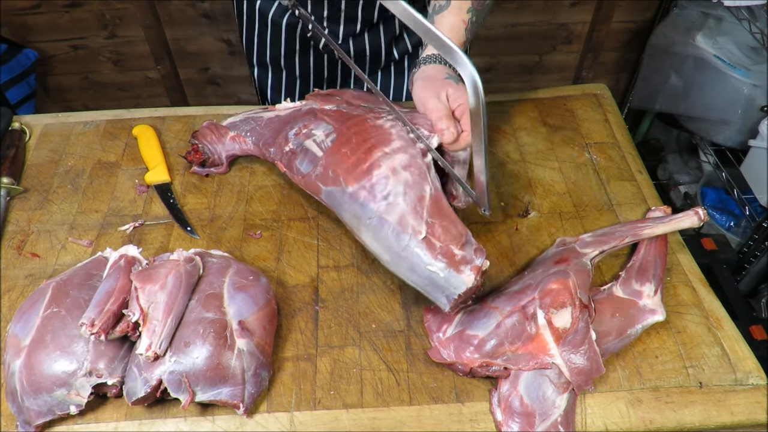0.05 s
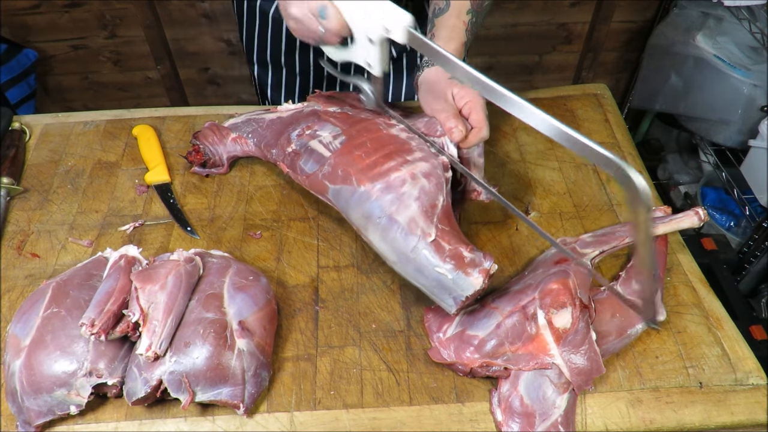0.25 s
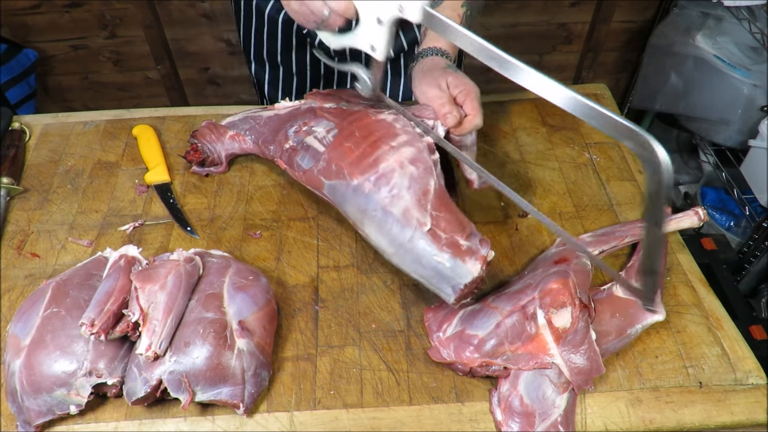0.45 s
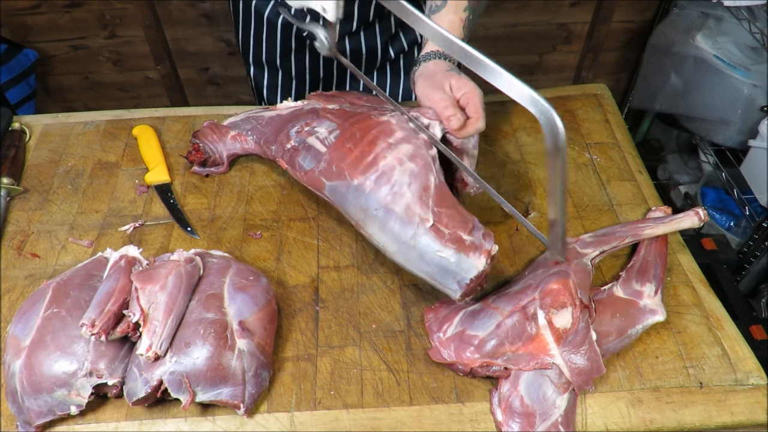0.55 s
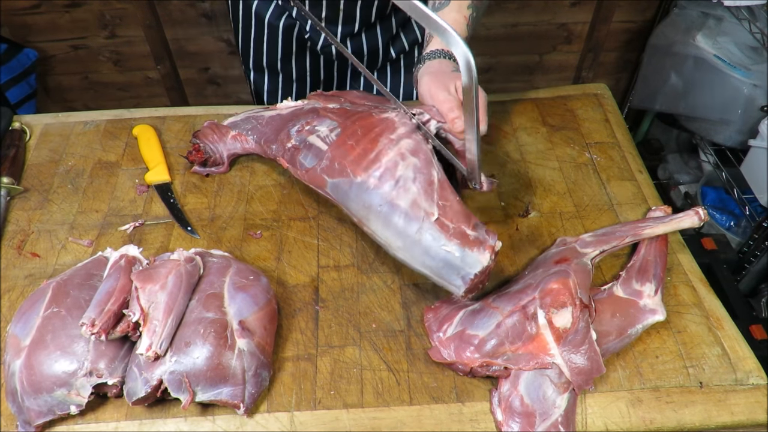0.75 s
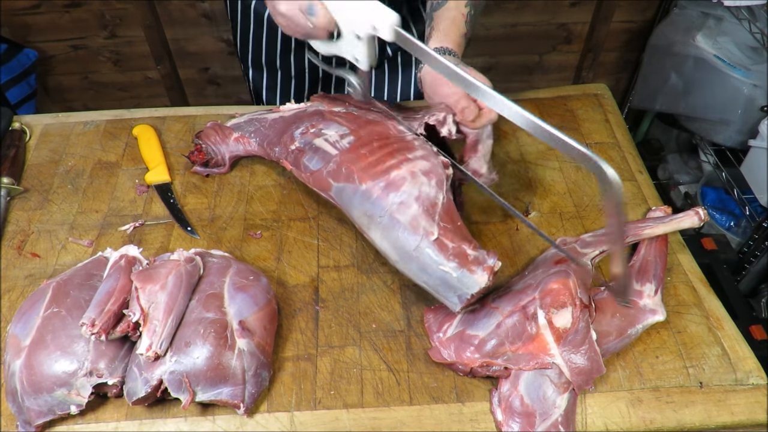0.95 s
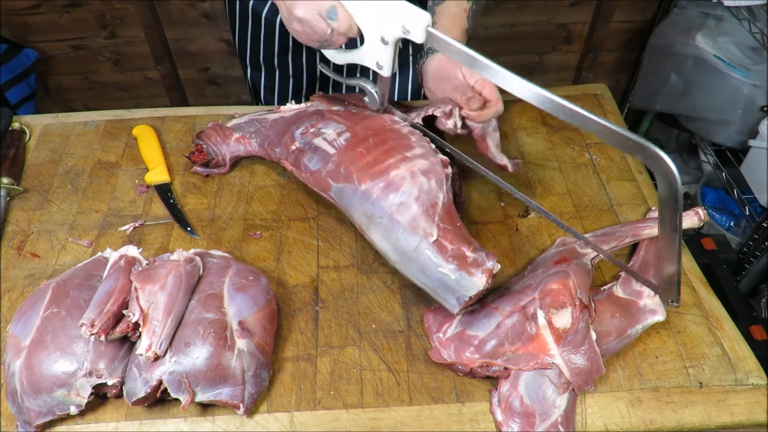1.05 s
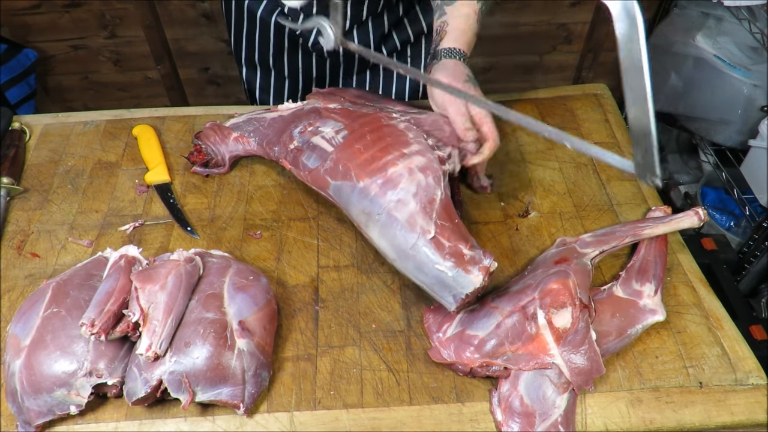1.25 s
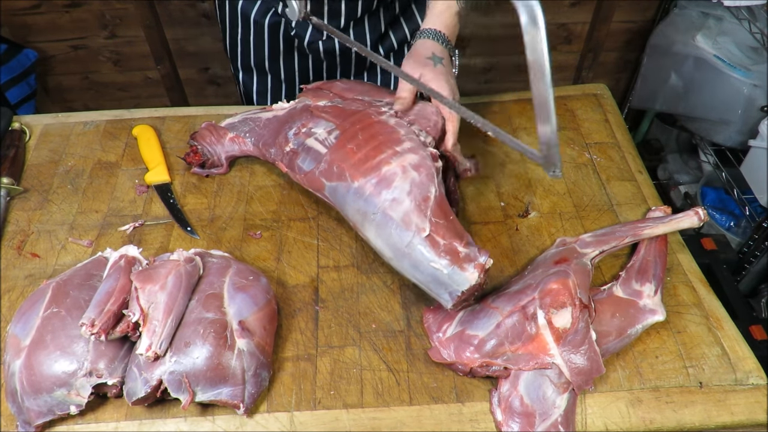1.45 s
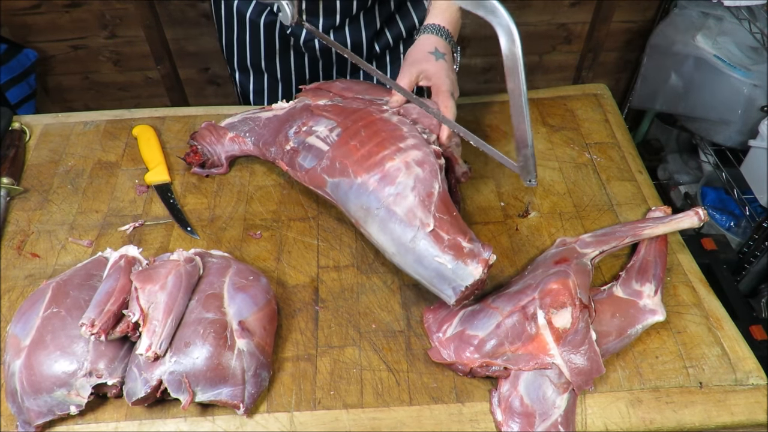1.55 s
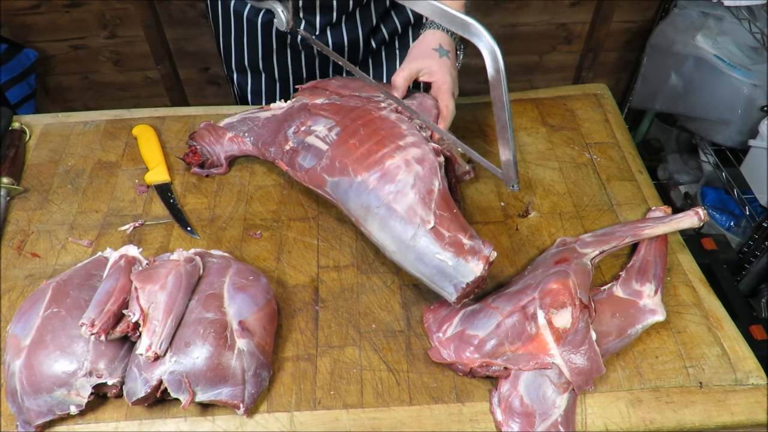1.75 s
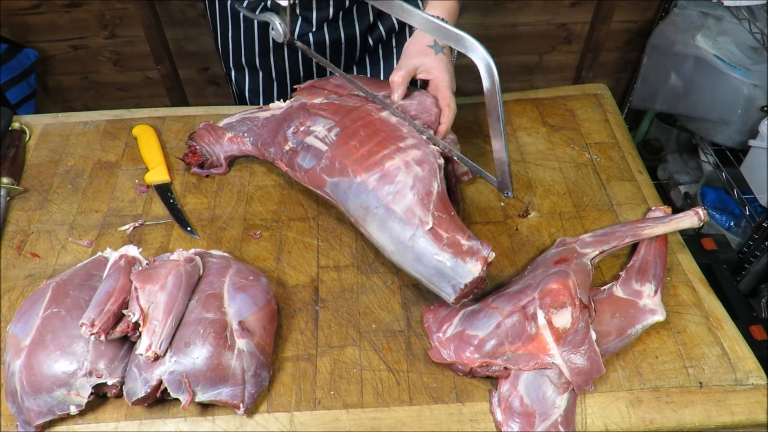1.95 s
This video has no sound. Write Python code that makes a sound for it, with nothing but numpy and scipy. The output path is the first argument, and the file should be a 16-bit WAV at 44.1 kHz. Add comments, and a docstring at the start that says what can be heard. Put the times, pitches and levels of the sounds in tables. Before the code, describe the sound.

Bone sawing heard close up: two quieter scratchy pulls alternate with two strong, hollow, groaning pushes with gritty hiss, then the saw rests, leaving a soft wet scuff, tiny ticks and quiet room air.

```python
"""A hand saw rasps through rib bone on a wooden block: first a pull, which only scrapes.
Then a push: the teeth bite faster, then slower, sweeping through the ring of bone and block.
A second pull and push follow, then rest with a few faint knocks, ticks and a scuff.
Struck resonators give the rings; filtered grains give the grit's hiss and the singing blade.
A small hard room and quiet air noise surround the nearly mono sound."""
import sys
import numpy as np
from scipy import signal
from scipy.io import wavfile
from scipy.ndimage import uniform_filter1d

SR = 44100
rng = np.random.default_rng(int(sys.argv[2]) if len(sys.argv) > 2 else 0)


def level_to_linear(level):
    """Convert decibel levels to linear amplitude factors, elementwise."""
    exponent = np.asarray(level, float) / 20
    return 10 ** exponent


def inscribe(sig):
    """Save sig as 16-bit PCM at rate SR to the path in sys.argv[1].

    A 1-D sig is mono; a 2-D sig holds one channel per row.
    Samples are clipped to [-1, 1] before scaling.
    """
    pcm = np.round(np.clip(np.atleast_2d(sig).T, -1, 1) * 32767)
    wavfile.write(sys.argv[1], SR, pcm.astype(np.int16))


N = 88773


def evened(x):
    """Power normalisation: scales to rms 1."""
    return x / np.sqrt(np.mean(x ** 2) + 1e-20)


def curve(rows, axis=1):
    """Piecewise-linear envelope: one column of a table over time."""
    rows = np.array(rows, float)
    return np.interp(np.arange(N) / SR, rows[:, 0], rows[:, axis])


def read(points, hz):
    """Logarithmic frequency scale: interpolates a spectrum table at hz."""
    f, value = np.transpose(points)
    return np.interp(np.log(hz + 1), np.log(f + 1), value)


def colour(x, points):
    """Minimum-phase filtering: shapes x to a spectrum, with filter energy 1."""
    level_db = np.maximum(read(points, abs(np.fft.fftfreq(4096, 1 / SR))), -100)
    log_gain = np.log(level_to_linear(level_db))
    # the Hilbert transform of the log gain gives the phase of a causal filter
    taps = np.fft.ifft(np.exp(np.conj(signal.hilbert(log_gain)))).real[:2048]
    return signal.oaconvolve(x, taps / np.linalg.norm(taps))[:N]


def ring(x, modes):
    """Modal resonance: x strikes a sum of dying sines, with total energy 1."""
    t = np.arange(6000) / SR
    taps = np.zeros(len(t))
    for k, (hz, width, db) in enumerate(modes):
        decay = np.exp(-np.pi * width * t)
        taps += (-1) ** k * level_to_linear(db) * width * decay * np.sin(2 * np.pi * hz * t)
    return signal.oaconvolve(x, taps / np.linalg.norm(taps))[:N]


def grains(per_s, spread_db):
    """Random impulse process: clicks of uneven size and random sign, rms 1."""
    size = level_to_linear(spread_db * np.minimum(rng.exponential(1, N), 4)) * rng.choice([-1., 1.], N)
    return evened(size * (rng.random(N) < per_s / SR))


# the push strokes: start_s, end_s
PUSH_STROKES = [(.255, .58), (.975, 1.4)]


def push_gate():
    """Stroke alternation: 1 during a push, 0 otherwise, with 10 ms ramps."""
    now = np.arange(N) / SR
    return sum(np.clip(np.minimum(now - a, b - now) / .01, 0, 1) for a, b in PUSH_STROKES)


# rate at which teeth pass the bone on the pushes: time_s, tooth_rate_hz
TOOTH_RATE = [(.25, 240), (.29, 380.8), (.318, 404), (.34, 637.4), (.365, 704.5), (.39, 518), (.405, 439),
              (.425, 438.5), (.445, 395), (.48, 384.2), (.55, 200), (.975, 260), (1.0, 381.5),
              (1.02, 393.1), (1.035, 396.6), (1.05, 569.5), (1.07, 644), (1.085, 559.3), (1.1, 515.7),
              (1.115, 440), (1.13, 410.9), (1.15, 396.7), (1.17, 367), (1.22, 203.9)]


def tooth_turns():
    """Phase accumulation: the integrated, slightly wobbling tooth rate counts teeth passed."""
    jitter = .05  # rms share of the tooth rate
    wobble = evened(uniform_filter1d(rng.standard_normal(N), size=120))
    return np.cumsum(curve(TOOTH_RATE) * (1 + jitter * wobble)) / SR


# groan of the block at the tooth rate, which also scales the tooth strikes: time_s, level_db
BITE_LEVEL = [(.27, -60), (.3, -31), (.318, -18), (.33, -30), (.36, -33), (.385, -30), (.405, -17),
              (.415, -26), (.43, -13), (.445, -17), (.455, -36), (.475, -45), (.484, -22), (.5, -50),
              (.52, -80), (.985, -70), (1.005, -29), (1.017, -14), (1.03, -23), (1.04, -40), (1.07, -27),
              (1.088, -17), (1.097, -28), (1.106, -13), (1.115, -18), (1.125, -14), (1.148, -19),
              (1.16, -36), (1.21, -80)]


def tooth_bites(turns, push):
    """Periodic forcing: a sine groan at the tooth rate, and one uneven impulse per tooth."""
    uneven_db, strikes_db = 6, -18  # spread of the bites; strikes relative to the groan
    bites = np.diff(np.floor(turns), prepend=0) * level_to_linear(uneven_db * rng.standard_normal(N))
    level_db = curve(BITE_LEVEL)
    groan = np.sqrt(2) * np.sin(2 * np.pi * turns) * level_to_linear(level_db) * push
    strikes = evened(bites) * level_to_linear(level_db + strikes_db) * push
    return groan, strikes


# uneven scraping, the deep ring before its trim on pushes:
# time_s, upper_bone_level_db, deep_ring_level_db, frame_ring_level_db
SCRAPE_LEVELS = [(0.0, -43.5, -27.5, -40.5), (0.024, -49, -52, -61), (0.046, -45, -33, -32.5),
                 (0.064, -36.5, -38, -31), (0.1, -38, -27, -37.5), (0.136, -46, -43.5, -58),
                 (0.166, -42.5, -31.5, -55), (0.184, -48.5, -47.5, -43), (0.238, -53.5, -49.5, -61),
                 (0.256, -71, -31.5, -46), (0.266, -49, -28, -36), (0.322, -29, -17.5, -22),
                 (0.368, -27, -23.5, -39), (0.4, -27.5, -17.5, -41), (0.426, -33, -20.5, -32),
                 (0.444, -47.5, -18, -35), (0.466, -39.5, -30, -40), (0.484, -44.5, -23.5, -42),
                 (0.578, -64, -52, -71), (0.64, -56.5, -42.5, -59), (0.666, -46.5, -31.5, -41.5),
                 (0.706, -43, -41.5, -57), (0.734, -44, -33.5, -34), (0.76, -44.5, -28.5, -43),
                 (0.796, -44.5, -32.5, -33.5), (0.836, -47, -35, -44), (0.85, -45, -33, -54.5),
                 (0.872, -44.5, -38.5, -46), (0.922, -56.5, -58.5, -65), (0.962, -67, -57.5, -69),
                 (0.98, -61, -25.5, -45.5), (1.002, -36.5, -20, -24), (1.02, -38.5, -29, -27),
                 (1.05, -27, -23, -38), (1.078, -28, -19, -37.5), (1.1, -32.5, -20.5, -49.5),
                 (1.132, -38, -16.5, -42.5), (1.162, -43, -23, -44), (1.27, -63.5, -44, -67),
                 (1.3, -64.5, -48, -60.5)]
# rings of the bone, relative levels: pitch_hz, width_hz, push_level_db, pull_level_db
BONE_MODES = [(546, 40, -8.5, 1), (652.7, 20, 1, -6), (868, 67, -5.5, -7), (960, 47, 1, -8),
              (1000, 35, 1, -5), (1113.6, 28, -2, -4), (1174.5, 49, -3.5, -11), (1238, 36, -7.5, -7),
              (1320, 36, -5, -10), (1448, 15, -3.5, -6), (1560, 58, -13.5, -3.5), (1702, 32, -3.5, -9.5),
              (1752, 45, -9, -13.5), (1880, 90, -8.5, -12.5), (2078, 70, -15.5, -21.5),
              (2322, 50.2, -8.5, -14), (2628, 75, -21.5, -32)]
# response between the modes, relative: frequency_hz, level_db_per_hz
BROAD_SPECTRUM = [(200, -29.5), (400, -11.5), (700, 1), (1200, -3.5), (2000, -7), (2800, -10),
                  (4000, -13.5), (6000, -22.5), (9000, -53.5)]
# deep rings of the block, relative levels: pitch_hz, width_hz, level_db
BLOCK_MODES = [(315, 12, -12), (339, 30, -9), (403, 40.7, 3), (460, 49, -6), (520.5, 19, -8.5)]
# rings of the saw frame, relative levels: pitch_hz, width_hz, level_db
FRAME_MODES = [(769.2, 26, 2), (1598, 69, -11)]


def ringing_body(strikes, push):
    """Forced modal vibration: tooth strikes and random slips ring bone, block and saw frame."""
    slips_per_s, slip_spread_db = 2700, 2.5
    broad_db, push_ring_db = -5.0, -7.0  # the deep ring yields to the groan on a push
    low_cut_hz = 270
    slips = grains(slips_per_s, slip_spread_db)
    drive = strikes + slips * level_to_linear(curve(SCRAPE_LEVELS))
    push_modes = [(hz, width, push_db) for hz, width, push_db, _ in BONE_MODES]
    pull_modes = [(hz, width, pull_db) for hz, width, _, pull_db in BONE_MODES]
    bone = ring(drive * push, push_modes) + ring(drive * (1 - push), pull_modes)
    broad = level_to_linear(broad_db) * colour(drive, BROAD_SPECTRUM)
    deep_db = curve(SCRAPE_LEVELS, axis=2) + push_ring_db * push
    block = ring(slips * level_to_linear(deep_db), BLOCK_MODES)
    frame = ring(slips * level_to_linear(curve(SCRAPE_LEVELS, axis=3)), FRAME_MODES)
    low_cut = signal.butter(6, low_cut_hz, "highpass", fs=SR, output="sos")
    return signal.sosfilt(low_cut, bone + broad + block + frame)


# drive of the grit, the blade before its trim on pushes, the fizz before its high-pass:
# time_s, hiss_level_db, blade_level_db, fizz_level_db
GRIT_LEVELS = [(0.0, -51, -54, -62), (0.02, -58, -53, -74.5), (0.042, -53, -58, -68.5),
               (0.05, -42.5, -41.5, -59.5), (0.076, -38, -40.5, -48), (0.136, -46, -39.5, -55),
               (0.148, -56, -76, -70), (0.166, -44.5, -41.5, -57), (0.238, -70.5, -64, -76.5),
               (0.264, -57.5, -64.5, -67), (0.3, -37.5, -39.5, -47.5), (0.346, -35, -37, -47.5),
               (0.4, -37, -41.5, -48.5), (0.55, -72, -76, -79), (0.592, -72.5, -72, -77.5),
               (0.604, -53, -70.5, -61.5), (0.644, -62.5, -67.5, -72), (0.672, -42, -43.5, -76),
               (0.69, -49.5, -53, -54.5), (0.698, -43.5, -43.5, -57.5), (0.726, -49, -48, -56),
               (0.796, -43, -39, -60), (0.86, -52, -50.5, -66), (0.872, -44.5, -43.5, -58),
               (0.954, -73, -70.5, -81), (0.974, -66, -68.5, -71.5), (0.994, -39, -55, -55),
               (1.01, -39, -46, -59.5), (1.024, -40.5, -44, -59.5), (1.064, -31.5, -30.5, -37),
               (1.086, -33.5, -40.5, -42), (1.204, -63.5, -62, -77.5), (1.266, -81.5, -64, -91),
               (1.3, -71.5, -75, -81)]
# colour of the grit hiss, relative: frequency_hz, level_db_per_hz
HISS_SPECTRUM = [(1180, -6.5), (2000, -4.5), (3070, -5), (4190, 0.5), (5190, 1.5), (6060, 0.5), (6550, 6),
                 (8180, 3), (15600, -13.5)]
# singing modes of the blade, relative levels: pitch_hz, width_hz, level_db
BLADE_MODES = [(5480, 120, -8), (5840, 180, -3), (6150, 110, 0)]


def grit_and_blade(turns, push):
    """Amplitude modulation: grit pulses with the teeth on pushes, hisses and excites the blade."""
    grains_per_s, grain_spread_db, pulse_depth = 9000, -1, .4
    push_song_db, fizz_hz = -4.0, 10500  # the loaded blade sings less
    pulse = 1 + pulse_depth * push * np.cos(2 * np.pi * turns)
    grit = grains(grains_per_s, grain_spread_db) * pulse
    hiss = colour(grit * level_to_linear(curve(GRIT_LEVELS)), HISS_SPECTRUM)
    song_db = curve(GRIT_LEVELS, axis=2) + push_song_db * push
    song = ring(grit * level_to_linear(song_db), BLADE_MODES)
    high_pass = signal.butter(2, fizz_hz, "highpass", fs=SR, output="sos")
    fizz = signal.sosfilt(high_pass, grit * level_to_linear(curve(GRIT_LEVELS, axis=3)))
    return hiss + song + fizz


# low shake through the table: time_s, level_db
RUMBLE_LEVEL = [(0.0, -59), (0.024, -68), (0.386, -70.5), (0.412, -62.5), (0.626, -94.5), (0.672, -68),
                (0.84, -79.5), (0.872, -66), (0.926, -78), (1.118, -63), (1.248, -81), (1.3, -77)]


def table_shake():
    """Band-limited random vibration: low noise follows a level envelope."""
    band = signal.butter(2, [35, 84.6], "bandpass", fs=SR, output="sos")  # Hz
    shake = signal.sosfilt(band, rng.standard_normal(N))
    return evened(shake) * level_to_linear(curve(RUMBLE_LEVEL))


def saw():
    """Superposition: groan, ringing body, grit and shake add, then fade as the saw lifts."""
    push, turns = push_gate(), tooth_turns()
    groan, strikes = tooth_bites(turns, push)
    body = ringing_body(strikes, push)
    lifted = np.clip((1.3 - np.arange(N) / SR) / 0.15, 0, 1)  # 1 until 1.15 s, 0 from 1.3 s
    return (groan + body + grit_and_blade(turns, push) + table_shake()) * lifted


# dull knocks on the block: start_s, level_db, pitch_hz, t60_s
BLOCK_KNOCKS = [(0.101, -26, 397, 0.065), (.162, -26, 415, 0.079), (0.27, -24, 460, 0.058),
                (0.603, -44.5, 218, 0.055), (0.734, -22, 404.5, 0.056), (.796, -30, 409.2, 0.047),
                (.848, -29, 395, 0.058), (0.87, -42.5, 214, 0.055), (1.288, -44, 601.7, 0.029),
                (1.29, -50, 197, 0.039), (1.32, -41, 421.1, 0.039), (1.357, -42, 420, .06),
                (1.402, -52.5, 432, 0.047), (1.428, -52.5, 402, 0.083), (1.892, -54, 250, 0.052)]


def knocks():
    """Damped free vibration: each knock is one sine dying exponentially after a 2 ms rise."""
    out, t = np.zeros(N + SR), np.arange(4000) / SR
    for start, db, hz, t60 in BLOCK_KNOCKS:
        tone = level_to_linear(db - 60 * t / t60) * np.sin(2 * np.pi * hz * t)
        out[round(start * SR):][:len(t)] += tone * np.minimum(t / 0.001926, 1)
    return out[:N]


# small bright ticks, level before the band filter: start_s, level_db, pitch_hz
BRIGHT_TICKS = [(0.156, -38.5, 8500), (0.603, -44.5, 6000), (.868, -43.5, 6700), (1.288, -57, 7472),
                (1.566, -56.5, 7280), (1.752, -61.5, 7280)]


def ticks():
    """Transient band-pass response: dying noise excites a band around each pitch."""
    out, t = np.zeros(N + SR), np.arange(4000) / SR
    for start, db, hz in BRIGHT_TICKS:
        burst = rng.standard_normal(len(t)) * level_to_linear(db - 60 * t / 0.09)  # t60 0.09 s
        band = signal.butter(2, [.75 * hz, 1.35 * hz], "bandpass", fs=SR)
        out[round(start * SR):][:len(t)] += signal.lfilter(*band, burst)
    return out[:N]


# soft wet scuffs: start_s, length_s, level_db
WET_SCUFFS = [(1.428, 0.186, -61)]
# colour of the scuffs, relative: frequency_hz, level_db_per_hz
SCUFF_SPECTRUM = [(150, -18), (350, 9), (450, -0.5), (800, -2.5), (1400, -5), (2200, -13), (5000, -17),
                  (9000, -22), (13000, -51)]


def scuffs():
    """Friction noise: coloured random grains swell quickly and fade slowly."""
    out, now = np.zeros(N), np.arange(N) / SR
    rub = colour(grains(5100, 3.9), SCUFF_SPECTRUM)
    for start, length, db in WET_SCUFFS:
        progress = np.clip((now - start) / length, 0, 1)
        out += level_to_linear(db) * rub * np.sin(np.pi * progress ** 0.35) ** 2
    return out


def small_sounds():
    """Superposition: knocks, ticks and scuffs of hands, bone and saw."""
    return knocks() + ticks() + scuffs()


# reverberation time by frequency: frequency_hz, t60_s
ROOM_DECAY = [(200, .5), (450, 0.48), (1000, 0.35), (3000, .36), (8000, 0.35), (15000, 0.14)]


def room(x):
    """Statistical reverberation: sparse taps of random sign, each band dying at its own speed."""
    taps = np.zeros(SR)
    at = np.arange(200, SR - 20, 20)
    taps[at + rng.integers(0, 20, len(at))] = rng.choice([-1., 1.], len(at))
    hz, t, bands = signal.stft(taps, SR, nperseg=256)
    bands = bands * level_to_linear(-60 * t / read(ROOM_DECAY, hz)[:, None])
    bands /= np.linalg.norm(bands, axis=1)[:, None]  # equal energy in every band
    tail = signal.istft(bands, SR, nperseg=256)[1]
    return signal.fftconvolve(x, tail / np.linalg.norm(tail))[:N]


# colour of the room noise, relative: frequency_hz, level_db_per_hz
AIR_SPECTRUM = [(12, -40.5), (20, -12.5), (59, -1), (109, -8), (245, -8), (343, -10.5), (441, -1),
                (507, -23), (551, -10.5), (1500, -20), (15600, -24.5)]


def air():
    """Stationary background: quiet coloured noise with a thin high sine whine."""
    noise_db, whine_hz, whine_db = -70, 15150, -86.5
    whine = level_to_linear(whine_db) * np.sin(2 * np.pi * whine_hz * np.arange(N) / SR)
    return level_to_linear(noise_db) * colour(rng.standard_normal(N), AIR_SPECTRUM) + whine


# colour of the microphone noise unlike on the two sides, relative: frequency_hz, level_db_per_hz
APART_SPECTRUM = [(12, -40.5), (20, -11), (116, -11), (282, -1), (324, -4), (688, -6), (1590, -11.5),
                  (15600, -16)]


def side_noise():
    """Uncorrelated noise: a faint side signal sets the two channels apart."""
    return level_to_linear(-74) * colour(rng.standard_normal(N), APART_SPECTRUM)


def scene():
    """Mid/side stereo: everything lies near the centre, with a faint side signal."""
    room_db, near_side_db = -11, -38
    near = saw() + small_sounds()
    mid = near + level_to_linear(room_db) * room(near) + air()
    side = level_to_linear(near_side_db) * near + side_noise()
    return np.array([mid + side, mid - side])


def top_cut(x):
    """Nothing passes above the cut-off."""
    return signal.sosfilt(signal.butter(12, 15740, fs=SR, output="sos"), x)


def record(dry):
    """Signal chain: the finished mix passes to its last stage unchanged."""
    return top_cut(dry)


dry = scene()
out = record(dry)
inscribe(out)
```